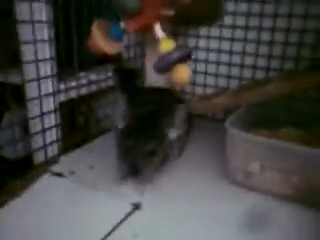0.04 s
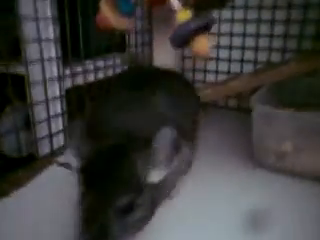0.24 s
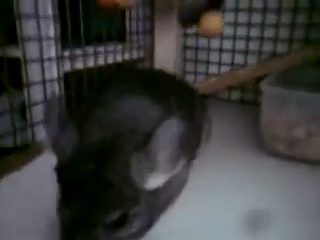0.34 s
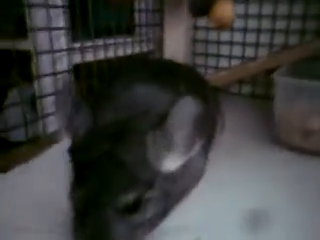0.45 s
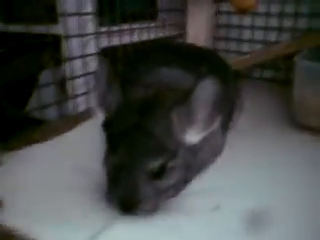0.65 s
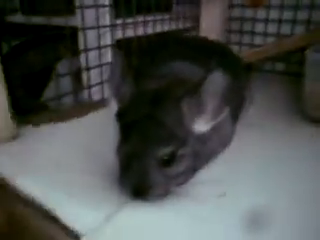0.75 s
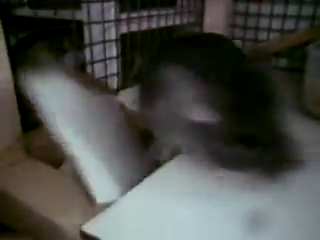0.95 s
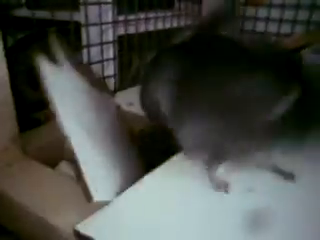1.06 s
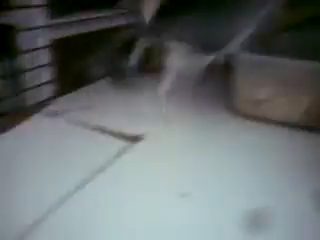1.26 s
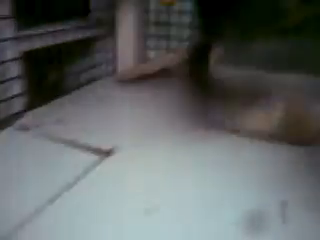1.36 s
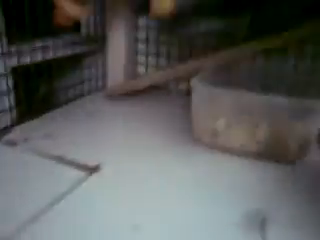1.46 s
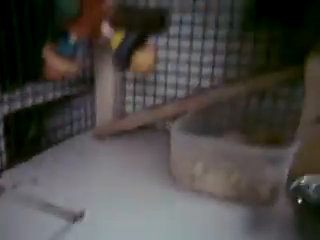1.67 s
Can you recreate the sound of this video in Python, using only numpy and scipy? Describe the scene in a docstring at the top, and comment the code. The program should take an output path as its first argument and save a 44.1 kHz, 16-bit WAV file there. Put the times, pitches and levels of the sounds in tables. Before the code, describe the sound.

A chinchilla barks six times in quick succession, each a harsh rasp narrowing into a hoarse squeal. Claws tick beforehand; afterwards it knocks a loose board and scrambles away. Close by in a cage, in a quiet room.

```python
"""A chinchilla gives six harsh barks on a shelf in its cage, close by in a quiet room.
Each bark is a fluttering rasp of air that narrows into a hoarse squeal; the cage walls throw it back.
Claws tick on the boards before the barks; afterwards the animal bumps a loose board and scrambles off.
A small, dull microphone softens the top end."""
import sys
import numpy as np
from scipy import signal
from scipy.fft import rfft, irfft
from scipy.io import wavfile

SR = 44100
rng = np.random.default_rng(int(sys.argv[2]) if len(sys.argv) > 2 else 0)


def to_wav(sig):
    """Store sig (one row per channel, or 1-D mono) as 16-bit WAV at the path in sys.argv[1].

    Samples outside -1..1 are clipped; the rate is SR.
    """
    pcm = np.clip(np.atleast_2d(sig), -1, 1) * 32767
    pcm = np.round(pcm).astype(np.int16)
    wavfile.write(sys.argv[1], SR, pcm.T)  # frames by channels


N = 74970

# The dull body of the wooden shelf. Each row: frequency in Hz, noise density in dB.
THUD = [(40, -23), (110, -21), (190, 0.5), (450, -5.5), (750, -2.5), (1100, -14), (1700, -12.5),
        (4000, -46), (9000, -34.5)]
# The bright, hard surface of the wood. Each row: frequency in Hz, noise density in dB.
CLACK = [(40, -47), (200, -36), (900, -7.5), (1500, -3.5), (2100, -6), (2900, 3), (4200, -5), (5500, -16.5),
         (9000, -38.5)]


def barks(lift_hz=350, squeal_width_hz=510, jitter_depth=0.026, release_s=0.035):
    """Forced air rasps; a hoarse squeal swells and falls mid-bark under a thin hiss; all of it flutters."""
    # Each row is a bark: start, length and attack in seconds; rasp level, its change over the bark, edge
    # level and squeal level in dB; top pitch and final fall in Hz; hiss and undertone levels in dB.
    calls = [(0.208, 0.069, 0.012, -27, 3, -26.5, -20.5, 3450, 99.6, -33.5, -37.5),
             (0.36, 0.11, 0.017, -23.5, -6.5, -33, -21.5, 3640, 150.5, -41.5, -38.5),
             (0.532, 0.13, 0.016, -22.5, -25.5, -29.5, -20, 3600, 599, -44, -42.5),
             (0.747, 0.096, 0.01, -25, -2, -35.5, -20.5, 3490, 250, -34, -43),
             (0.974, 0.14, 0.015, -24.5, -18, -30, -19.5, 3656, 250, -42.5, -44),
             (1.174, 0.084, 0.014, -22, -5, -30.5, -21.5, 3640, 199, -35, -36)]
    # The colour of the rasping breath. Each row: frequency in Hz, noise density in dB.
    air_spectrum = [(200, -38.5), (520, -31.5), (1100, -44), (1700, -37.5), (2250, -19.5), (3000, -2.5),
                    (3400, 1), (4100, -0.5), (5000, -3), (5700, -11.5), (7000, -19.5), (9000, -32.5)]
    # The throaty undertone. Each row: frequency in Hz, noise density in dB.
    throat_spectrum = [(200, -32), (1050, -35), (1500, -10), (1950, -2.5), (2400, -1), (2800, 5),
                       (3500, -13.5), (9000, -49)]
    air, throat = noise(air_spectrum), noise(throat_spectrum)
    flutter = unit(amp(wobble(hz=175)))  # 1 dB rms
    jitter = wobble(hz=93)
    out, t = np.zeros(N), np.arange(SR // 4) / SR
    for (start, length, attack_s, rasp_db, fade_db, edge_db, squeal_db,
         top_hz, fall_hz, hiss_db, throat_db) in calls:
        here = round(start * SR) + np.arange(len(t))
        progress = np.minimum(t / length, 1)
        attack = 1 - np.exp(-(t / attack_s) ** 2)
        release = amp(-20 * np.maximum(t - length + release_s / 2, 0) / release_s)
        edge = amp(edge_db) * whistle(hz=4710, width=880, size=len(t))  # resonance of the open mouth
        breath = amp(rasp_db) * air[here] + amp(throat_db) * throat[here]
        rasp = amp(fade_db * progress ** 2) * (breath + edge)
        arch_hz = top_hz - np.where(progress < .5, lift_hz, fall_hz) * (2 * progress - 1) ** 2
        hz = arch_hz * (1 + jitter_depth * jitter[here])
        squeal = whistle(hz, squeal_width_hz, len(t))
        squeal += amp(-12.5) * whistle(1.115 * hz, squeal_width_hz, len(t))  # weaker resonance above
        swell = np.exp(-.5 * ((t / length - 0.53) / 0.29) ** 2)  # peaks just past the middle
        hiss = amp(hiss_db) * np.sqrt(progress) * whistle(hz=6370, width=1520, size=len(t))
        add(out, start, attack * release * (rasp + amp(squeal_db) * swell * squeal + hiss))
    return out * flutter


def cage(voice):
    """The cage rings at narrow resonances and its walls throw back quick echoes."""
    # The ring of the cage. Each row: frequency in Hz, gain in dB.
    resonances = [(2745, -3), (3117, -0.5), (3279, -7.5), (3471, -9), (3580, -12.5), (3704, -10), (4146, 3),
                  (4603, -12.5), (4728, -8.5), (5800, 7)]
    ringing = voice + sum(amp(db) * resonate(voice, hz, width=39.7) for hz, db in resonances)
    return ringing + amp(-1.5) * reflections(ringing, t60=0.063, first_s=.0015)


def claws(ring_t60=0.0027):
    """Claws tick on hard board: a bright scratch and a brief two-mode ring."""
    # Each row is a tick: start in seconds, level in dB, scratch T60 in seconds, pitch in Hz.
    ticks = [(0.0446, -26.5, 0.0049, 3700), (.053, -34.5, 0.031, 3400), (0.059, -39, 0.019, 3700),
             (0.0662, -24.5, 0.014, 3560), (0.071, -30, 0.008, 3100), (0.084, -27, 0.0075, 3900),
             (0.0906, -31.5, 0.012, 3570), (1.1667, -21.5, 0.0079, 3310), (1.5132, -16.5, 0.0088, 3740),
             (1.54, -31, 0.012, 3830)]
    # The colour of the scratch. Each row: frequency in Hz, noise density in dB.
    scratch_spectrum = [(200, -9), (1500, -19.5), (3100, 0.5), (4300, 6.5), (5200, -12.5), (7000, -19),
                        (9000, -24)]
    out, scratch = np.zeros(N), amp(-1) * noise(scratch_spectrum)
    for start, db, t60, hz in ticks:
        ping = amp(6.5) * ring(start, [(hz, 0, ring_t60), (1.4 * hz, -8, ring_t60)])
        out += amp(db) * (scratch * blow(start, t60, rise_s=0.0017) + ping)
    return out


def knocks():
    """Feet and a loose board hit the shelf: a dull thud, a woody clack, and both boards ring on."""
    # Each row is a knock: start in seconds, thud and clack levels in dB, their T60 in seconds,
    # ring levels of the shelf and of the loose board in dB.
    hits = [(0.09, -50, -74.5, 0.024, -57, -56), (1.341, -37.5, -43.5, 0.1, -42.5, -66),
            (1.385, -36, -40.5, 0.057, -63, -31.5), (1.4194, -46.5, -22, 0.038, -48, -54),
            (1.453, -35.5, -41.5, 0.068, -42.5, -39), (1.562, -47, -30, 0.039, -58.5, -36)]
    # The low ring of the shelf. Each row: frequency in Hz, level in dB, T60 in seconds.
    shelf_modes = [(180.6, 0.5, 0.16), (297, -16.5, 0.62), (451, 7.5, 0.054), (604, -6, 0.3)]
    # The higher ring of the loose board. Each row: frequency in Hz, level in dB, T60 in seconds.
    board_modes = [(903, -13.5, 0.22), (1066, -4.5, 0.072), (1303, -12, 0.11), (2940, -16.5, 0.36)]
    out, thud, clack = np.zeros(N), noise(THUD), noise(CLACK)
    for start, thud_db, clack_db, t60, shelf_db, board_db in hits:
        out += blow(start, t60) * (amp(thud_db) * thud + amp(clack_db) * clack)
        out += amp(shelf_db) * ring(start, shelf_modes) + amp(board_db) * ring(start, board_modes)
    return out


def footfalls():
    """Padded feet push on the shelf with soft, deep thumps."""
    # Each row is a step: start in seconds, level in dB, T60 in seconds.
    steps = [(0.091, -51, 0.065), (1.118, -47.5, 0.12), (1.18, -50.5, 0.29), (1.516, -53, 0.65)]
    # The colour of the thump. Each row: frequency in Hz, noise density in dB.
    thump_spectrum = [(30, -12.5), (95, 2.5), (170, -11), (270, -5), (450, -18), (1500, -24), (9000, -81.5)]
    envelope = sum(amp(db) * blow(start, t60, rise_s=0.0037) for start, db, t60 in steps)
    return envelope * noise(thump_spectrum)


def scuffs(grain_db=3):
    """Fur and paws brush the shelf in grainy swells as the animal shifts and runs."""
    # Each row is a brush: centre and half length in seconds, low rub and high rustle levels in dB.
    brushes = [(0.932, 0.0082, -88, -51.5), (1.062, 0.058, -64, -69), (1.149, 0.019, -49.5, -73),
               (1.21, 0.11, -63.5, -53.5), (1.44, 0.068, -48.5, -49), (1.5, 0.058, -54, -71),
               (1.604, 0.013, -63, -60), (1.69, 0.21, -80, -54)]
    t, rub = np.arange(N) / SR, noise(THUD)
    rustle = noise(CLACK) * unit(amp(grain_db * wobble(hz=302)))
    return sum(np.exp(-((t - centre) / half) ** 2) * (amp(rub_db) * rub + amp(rustle_db) * rustle)
               for centre, half, rub_db, rustle_db in brushes)


def room_tone():
    """The faint, steady hiss of a quiet room."""
    # The colour of the hiss. Each row: frequency in Hz, noise density in dB.
    hiss_spectrum = [(25, 1.5), (60, 3), (350, -1.5), (1000, -8), (3700, -4), (5500, -9.5), (8000, -17),
                     (9000, -29)]
    return amp(-61.5) * noise(hiss_spectrum)


def reflections(x, t60, first_s, echoes_per_s=3000):
    """Sparse echoes of random sign that die away."""
    t = np.arange(SR // 2) / SR
    taps = rng.choice([-1., 1.], len(t)) * (rng.random(len(t)) < echoes_per_s / SR)
    tail = taps * (t > first_s) * np.exp(-np.log(1000) * t / t60)
    return signal.fftconvolve(x, tail / np.linalg.norm(tail))[:N]


def ring(start, modes, rise_s=0.00072):
    """Dying modes of a struck object."""
    out, t = np.zeros(N), np.arange(SR // 2) / SR
    tone = sum(amp(db - 60 * t / t60) * np.sin(2 * np.pi * hz * t) for hz, db, t60 in modes)
    add(out, start, np.minimum(t / rise_s, 1) * tone)
    return out


def blow(start, t60, rise_s=0.0016):
    """Envelope of a hit: quick rise, exponential decay."""
    t = np.maximum(np.arange(N) / SR - start, 0)
    return np.minimum(t / rise_s, 1) * np.exp(-np.log(1000) * t / t60)


def whistle(hz, width, size):
    """Turbulent air through a steep resonance, rms 1."""
    return unit(resonate(resonate(rng.standard_normal(size), hz, width), hz, width))


def resonate(x, hz, width):
    """A resonance of gain 1 that can follow a moving pitch; its width is in Hz."""
    turn = np.exp(2j * np.pi * np.cumsum(hz * np.ones(len(x))) / SR)
    pole = np.exp(-np.pi * width / SR)
    return 2 * (turn * signal.lfilter([1 - pole], [1, -pole], x / turn + 1e-18)).real


def wobble(hz):
    """Random drift of rms 1, up to about the given rate."""
    rolloff = np.exp(-(np.fft.rfftfreq(N, 1 / SR) / hz) ** 2)
    return unit(irfft(rfft(rng.standard_normal(N)) * rolloff, N))


def noise(points):
    """Noise of rms 1 with the given spectral shape."""
    return unit(colour(rng.standard_normal(N), points))


def colour(x, points):
    """Filters by an EQ curve drawn on a log-frequency axis."""
    f, db = np.transpose(points)
    hz = np.fft.rfftfreq(len(x), 1 / SR)
    return irfft(rfft(x) * amp(np.interp(np.log(hz + 1), np.log(f), db)), len(x))


def add(mix, s, sound):
    """Mixes a sound in at s seconds."""
    part = mix[round(s * SR):][:len(sound)]
    part += sound[:len(part)]


def amp(db):
    """Decibels to gain."""
    return 10 ** (np.asarray(db) / 20)


def unit(x):
    """Scales to rms 1."""
    return x / np.sqrt(np.mean(x ** 2) + 1e-20)


def scene():
    """The barks ring in the cage; barks and footwork share the room and its faint hiss."""
    near = amp(-4.5) * cage(barks()) + claws() + knocks() + footfalls() + scuffs()
    room = amp(-13.5) * reflections(near, t60=0.2, first_s=.008)
    return (near + room + room_tone())[None]


def record(dry, cutoff_hz=9044):
    """A dull little microphone, then a steep low-pass."""
    # The microphone's response. Each row: frequency in Hz, gain in dB.
    mic_response = [(20, -3.5), (7000, -0.5), (7800, -6.5), (8600, -15), (9400, -27.5)]
    low_pass = signal.firwin(301, cutoff_hz, window=("kaiser", 9), fs=SR)
    return signal.oaconvolve(colour(dry[0], mic_response), low_pass, "same")[None]


dry = scene()
out = record(dry)
to_wav(out)
```